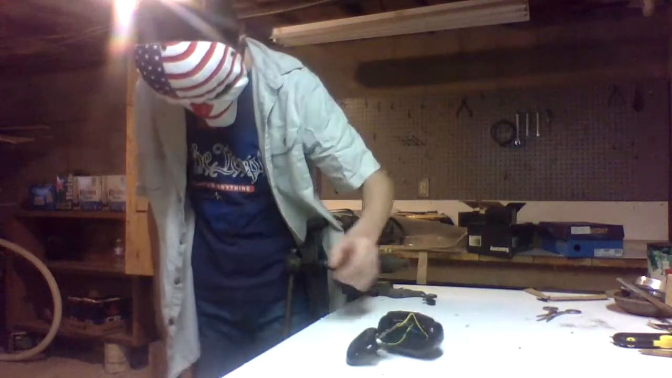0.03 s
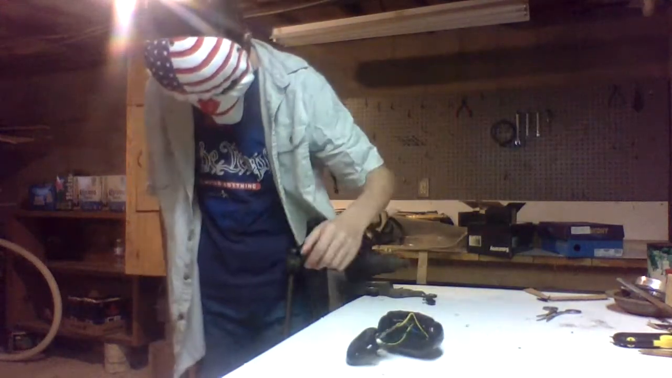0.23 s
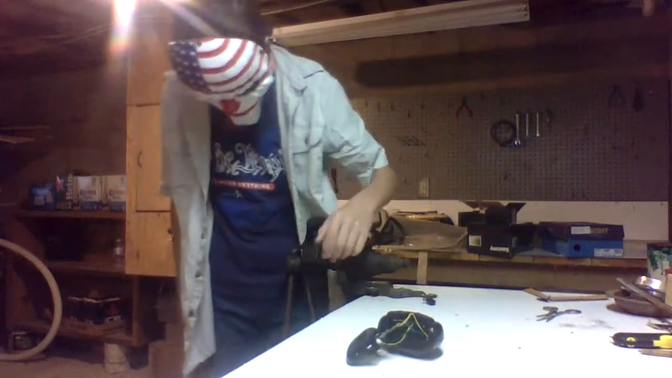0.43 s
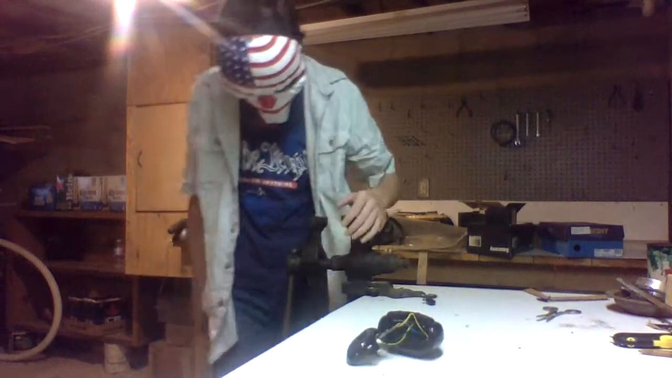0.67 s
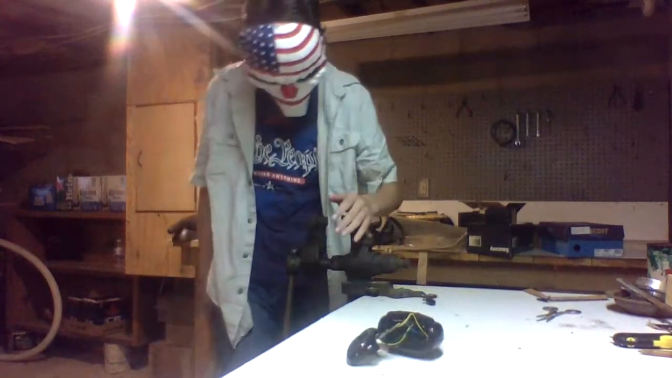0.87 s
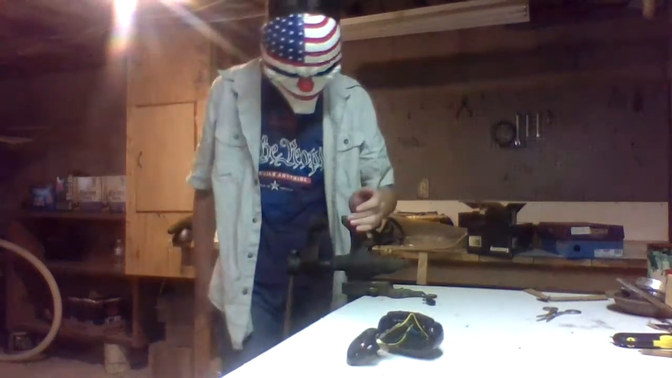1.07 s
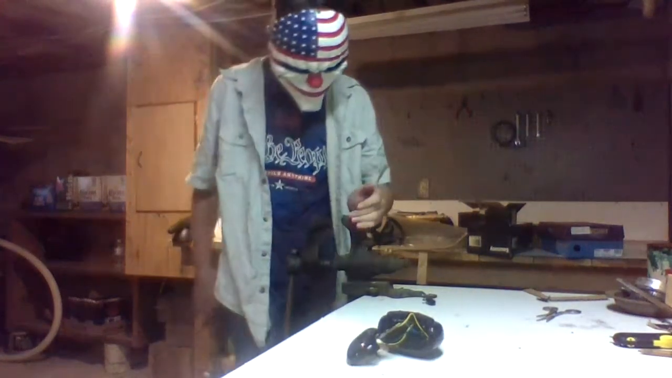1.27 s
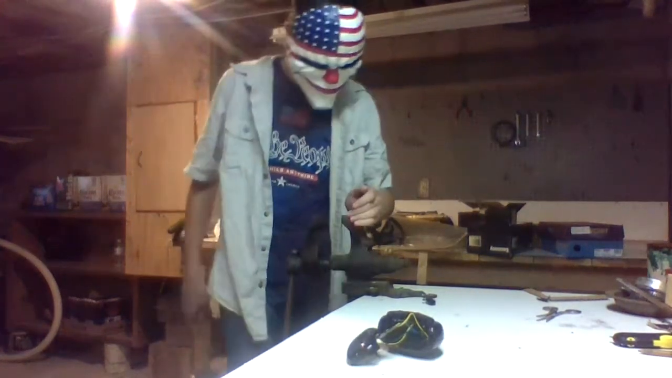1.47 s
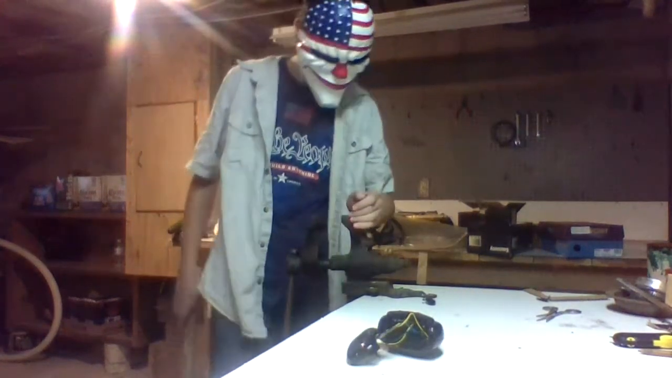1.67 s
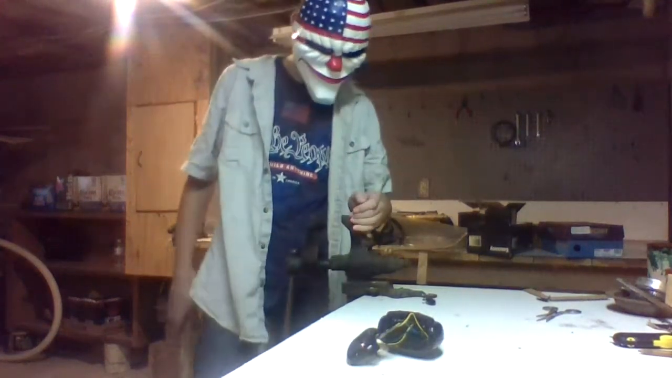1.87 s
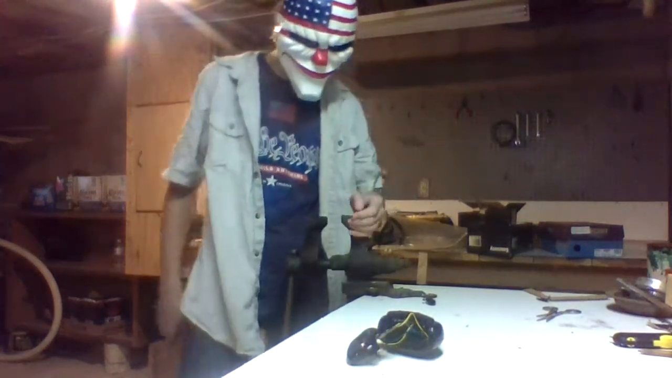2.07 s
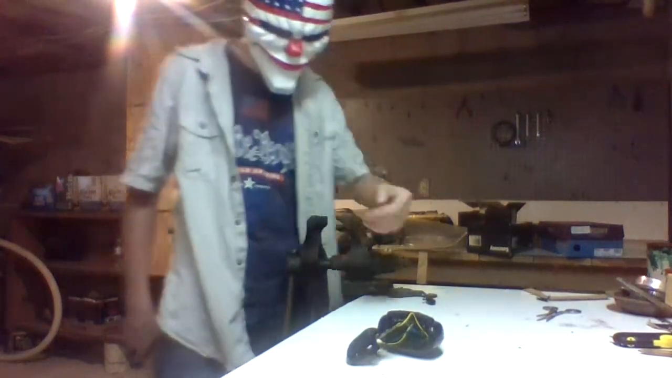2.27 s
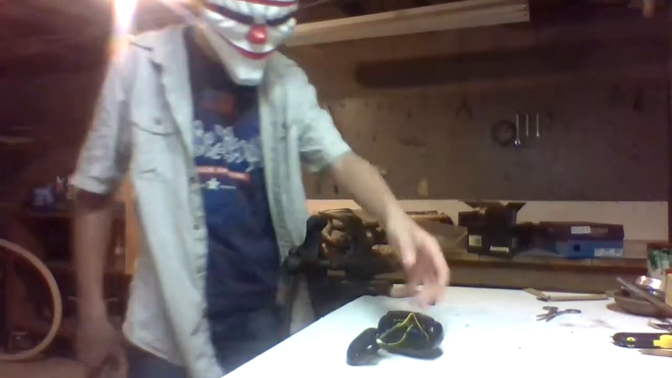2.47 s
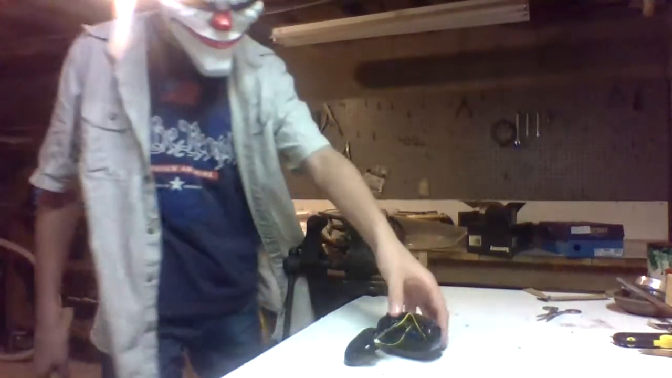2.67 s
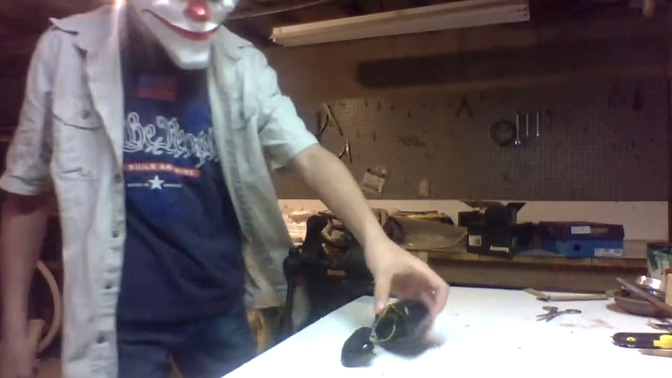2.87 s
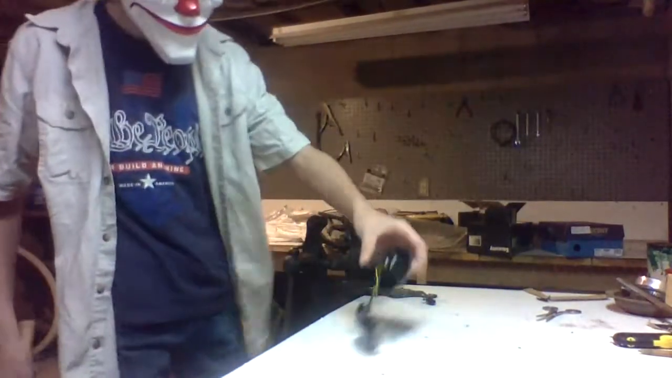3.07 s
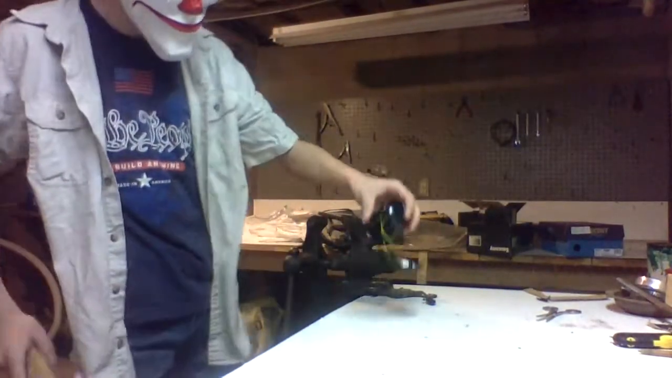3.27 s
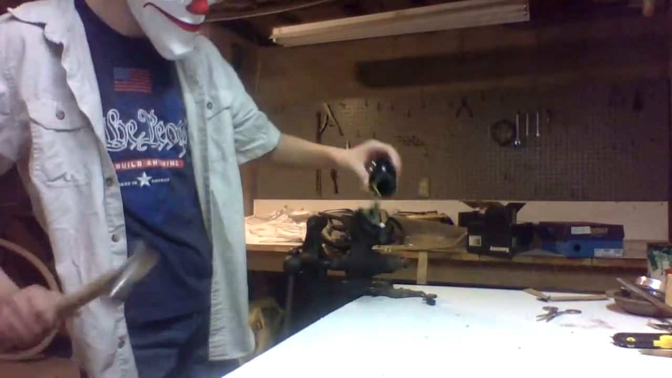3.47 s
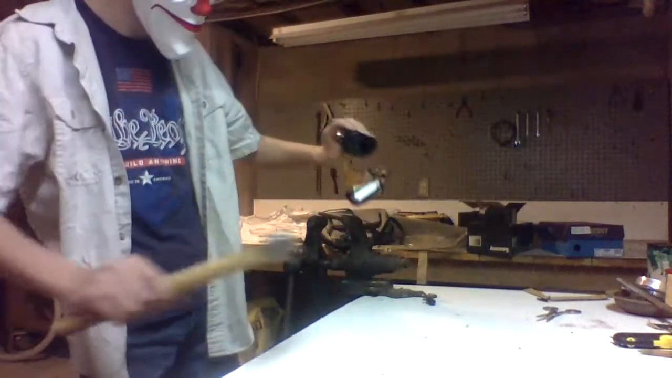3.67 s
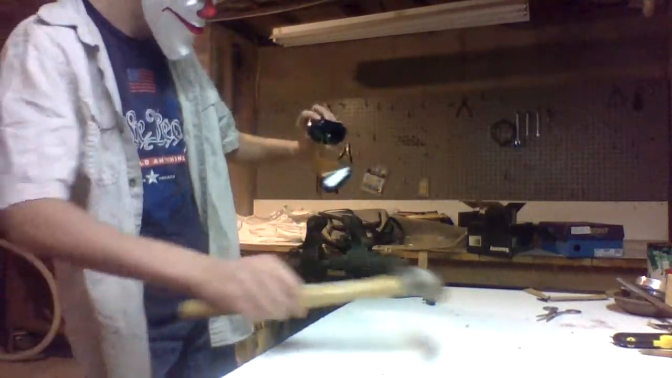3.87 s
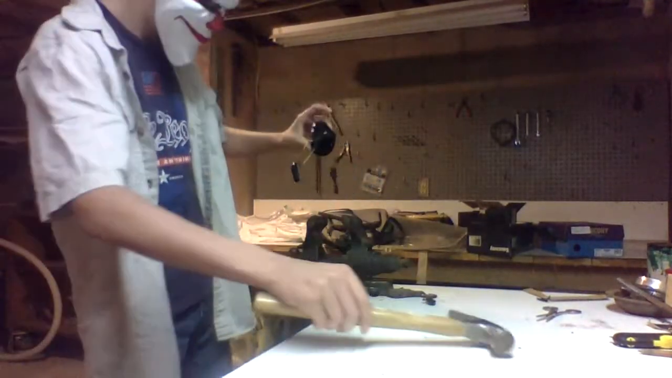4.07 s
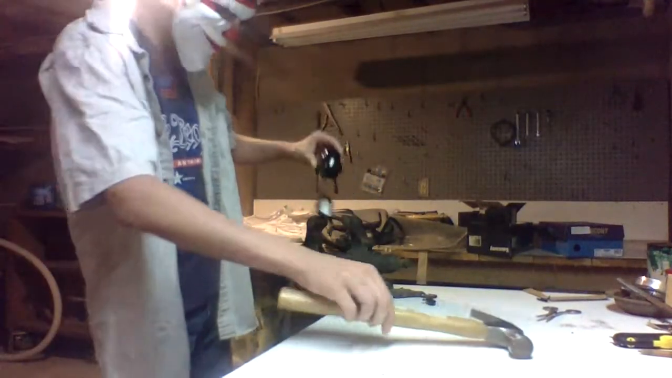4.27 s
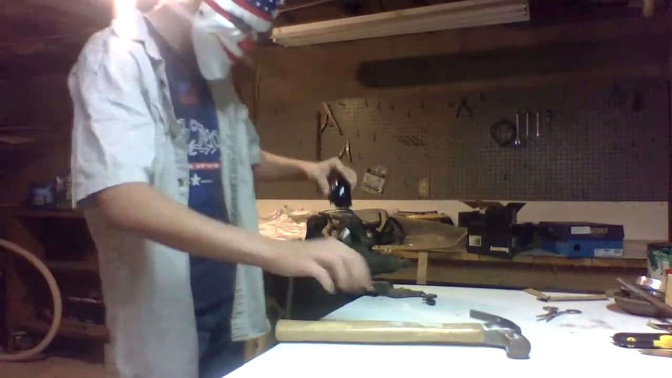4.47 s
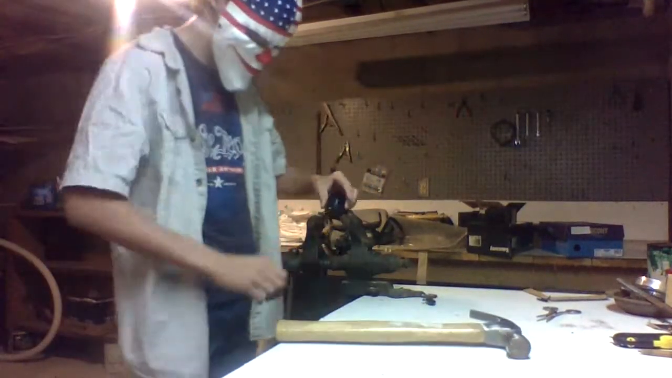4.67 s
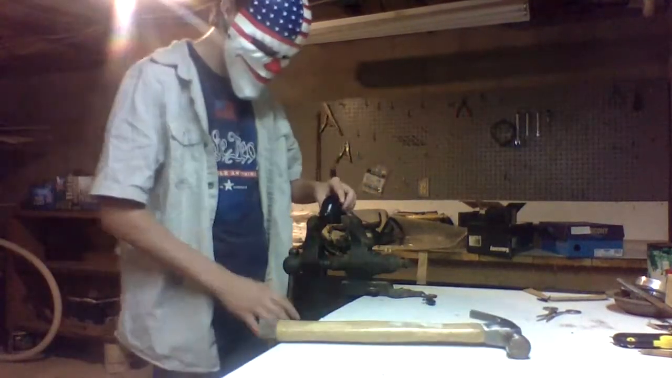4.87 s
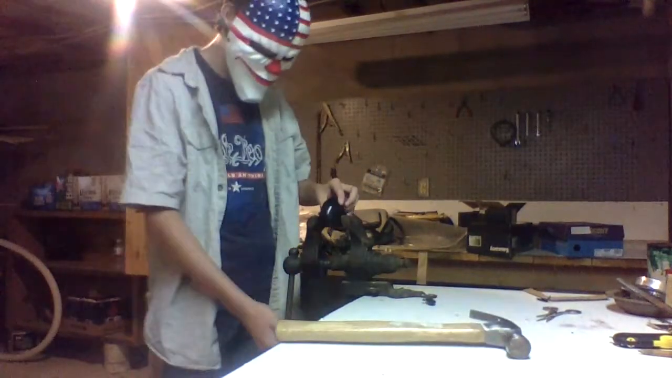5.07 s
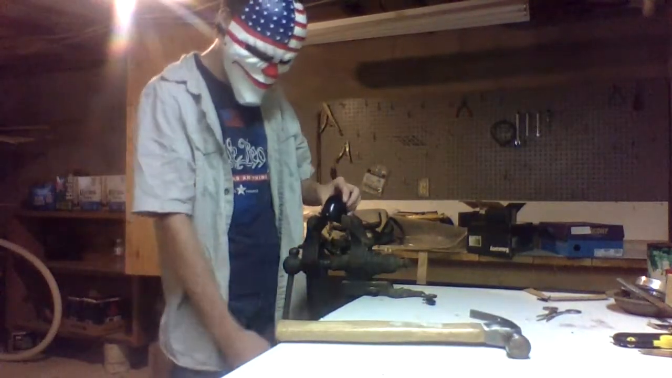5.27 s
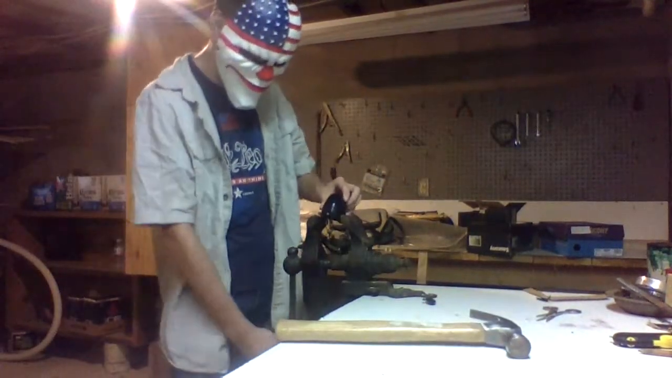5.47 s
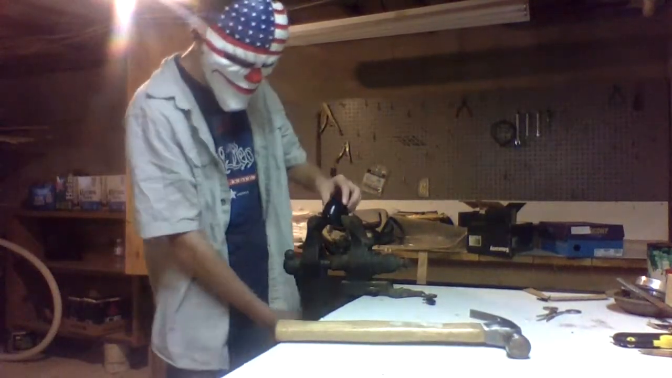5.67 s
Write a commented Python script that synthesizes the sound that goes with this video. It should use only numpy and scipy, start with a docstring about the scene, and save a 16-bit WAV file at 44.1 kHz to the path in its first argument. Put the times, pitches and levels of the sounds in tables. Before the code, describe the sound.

Mono close bench pickup with wavering mains hum, low rumble, faint whine and hiss. First come gritty scraping of plastic shards under a shoe and stick-slip squeaks, then thin scuffs, cloth rustle and hollow knocks of a plastic case. A heavy hammer lands on the bench, bounces and bangs again, overloading the input. Loose plastic parts clack, soft footsteps thump, and the shoe scrapes once more. The room tail is short.

```python
"""A workshop heard in mono at the bench: wavering mains hum, whine, rumble and hiss lie under everything.
A sleeve rustles, then a shoe sweeps plastic shards over gritty floor: grains crackle, stick-slip squeals.
Thin scuffs and knocks of a hollow clock case follow, with loose parts rubbing and clacking as damped modes.
A hammer dropped on the bench, noise bands and modes dying together, drives the input into clipping.
More clacks come after it, then low footfalls and one last short sweep of the shoe."""
import sys
import numpy as np
from scipy import signal
from scipy.fft import rfft, irfft
from scipy.io import wavfile
from scipy.ndimage import uniform_filter1d

SR = 44100
rng = np.random.default_rng(int(sys.argv[2]) if len(sys.argv) > 2 else 0)


def to_wav(sig):
    """Store sig (one row per channel, or 1-D mono) as 16-bit WAV at the path in sys.argv[1].

    Samples outside -1..1 are clipped; the rate is SR.
    """
    pcm = np.clip(np.atleast_2d(sig), -1, 1) * 32767
    pcm = np.round(pcm).astype(np.int16)
    wavfile.write(sys.argv[1], SR, pcm.T)  # frames by channels


N = 252252
TIME = np.arange(N) / SR  # s
FREQ = np.maximum(np.arange(N // 2 + 1) * SR / N, 1)  # Hz


def undb(db):
    """Level law: decibels to amplitude gain."""
    return 10 ** (np.asarray(db) / 20)


def unit(x):
    """Normalisation: scale to rms 1."""
    return x / np.sqrt(np.mean(x ** 2))


def colour(x, points):
    """Spectral shaping by a (Hz, dB) outline that falls 18 dB per octave more beyond its ends."""
    hz, db = np.transpose(points)
    octaves_below = np.maximum(np.log2(hz[0] / FREQ), 0)
    octaves_above = np.maximum(np.log2(FREQ / hz[-1]), 0)
    outline_db = np.interp(np.log(FREQ), np.log(hz), db)
    gain = undb(outline_db - 18 * (octaves_below + octaves_above))
    return unit(irfft(rfft(x) * gain, N))


def resonate(x, modes):
    """Forced resonance: parallel second-order responses, each (Hz, width Hz, dB)."""
    gain = sum(undb(db) / (1 + 1j * hz / width * (FREQ / hz - hz / FREQ)) for hz, width, db in modes)
    return unit(irfft(rfft(x) * gain, N))


def walk(rate):
    """Low-passed chance: random steps at a rate in Hz, smoothed, with a spread near 1."""
    step = max(int(SR / rate), 1)
    held = np.repeat(rng.standard_normal(N // step + 1), step)
    # smoothing lowers the spread; the factor restores it
    return np.sqrt(3 / 2) * uniform_filter1d(held, step)[:N]


def grains(per_s, spread_db):
    """Granular friction: a random train of tiny clicks of unequal size."""
    size = undb(spread_db * np.minimum(rng.exponential(size=N), 5))
    present = rng.random(N) < per_s / SR
    return unit(present * size * rng.standard_normal(N))


def swell(middle_s, half_s):
    """Gaussian envelope: a bell-shaped rise and fall."""
    return np.exp(-.5 * ((TIME - middle_s) / half_s) ** 2)


def gesture(start_s, rise_s, hold_s, release_db_per_s):
    """Envelope of one movement: a linear rise, a hold and an exponential release."""
    age = TIME - start_s
    release_s = np.maximum(age - rise_s - hold_s, 0)
    return np.clip(age / rise_s, 0, 1) * undb(-release_db_per_s * release_s)


def add(out, s, x):
    """Superposition: mix x in at time s."""
    i = int(s * SR)
    out[i:i + len(x)] += x[:N - i]


def strikes(events, body, modes, modes_db, crack_db, crack_s):
    """Impact response: a short crack, a dense ring that dies band by band, and the object's own modes."""
    t = TIME[:SR // 2]
    centres = 44 * 2 ** (np.arange(18) / 2)  # Hz, half an octave apart
    hz, db, t60 = np.transpose(body)
    band_db = np.interp(np.log(centres), np.log(hz), db)
    band_t60 = np.interp(np.log(centres), np.log(hz), t60)
    filters = [signal.butter(2, [f / 2 ** .25, f * 2 ** .25], "band", fs=SR, output="sos") for f in centres]
    out = np.zeros(N)
    for s, level_db, tilt_db, length in events:
        # the point of contact decides how much of each band and mode is woken
        chance_db = rng.standard_normal(len(centres))
        weight = undb(band_db + tilt_db * np.log2(centres / 500) + chance_db)
        # normalise by the noise power the bands pass
        weight = weight / np.sqrt(np.sum(weight ** 2 * centres) / (np.sqrt(2) * SR))
        # a hand or a second contact shortens the ring
        fade = -np.log(1000) * t / max(length, .1)
        decay = np.exp(fade / band_t60[:, None]) + undb(crack_db) * np.exp(-t / crack_s)
        noise = rng.standard_normal(2 * len(t))
        # the first half of the noise lets the filters settle
        bands = np.array([signal.sosfilt(sos, noise)[len(t):] for sos in filters])
        hit = weight @ (bands * decay)
        for f, mode_db, ring_s in modes:
            size = undb(modes_db + mode_db + 2 * rng.standard_normal()) * rng.choice([-1, 1])
            detune = 1 + .025 * rng.standard_normal()
            hit = hit + size * np.sin(2 * np.pi * f * detune * t) * np.exp(fade / ring_s)
        add(out, s, undb(level_db) * hit)
    return out


def damped(hits, ring, halving_db):
    """Contact damping: a part pressed home firmly stops sooner than one that merely taps."""
    typical_db = -18  # a hit at this level has ring length factor ring
    return [(s, db, tilt, ring * .5 ** ((db - typical_db) / halving_db)) for s, db, tilt in hits]


def room(x, wet_db, t60_s):
    """Reverberation: a cluttered shop answers with a short, exponentially decaying diffuse tail."""
    t = TIME[:SR // 2]
    tail = rng.standard_normal(len(t)) * np.exp(-np.log(1000) * t / t60_s)
    tail = tail * (t > .005)  # the first reflections arrive after 5 ms
    return x + undb(wet_db) * signal.fftconvolve(x, tail / np.sqrt(np.sum(tail ** 2)))[:N]


def background():
    """Stationary sources: steady tones with wandering phase and level, and two shaped noises."""
    # Mains hum. Each row: frequency in Hz, rms level in dB before the waver.
    hum_tones = [(59.2, -29.5), (120, -41.5), (180, -59.5)]
    # Faint electronic whine. Each row: frequency in Hz, rms level in dB before the waver.
    whine_tones = [(2896, -64), (8000, -57), (11590, -65), (13103, -60)]
    # Spectrum of the microphone hiss. Each row: frequency in Hz, relative level in dB.
    hiss_outline = [(150, -49), (250, -3.5), (1770, -13.5), (2980, -12), (3480, -13), (6380, -12.5),
                    (7580, -16), (7990, -13), (15700, -8.5)]
    tones = np.zeros(N)
    for hz, db in hum_tones + whine_tones:
        phase = 2 * np.pi * hz * TIME + 0.6 * walk(3.5)
        tones += undb(db) * np.sqrt(2) * np.sin(phase)
    rumble = colour(rng.standard_normal(N), [(22, 10.5), (60, 0.5), (110, -8.5), (250, -15.5)])
    hiss = colour(rng.standard_normal(N), hiss_outline)
    return tones * undb(.5 * walk(4.6)) + undb(-35.5) * rumble + undb(-40) * hiss


def footfalls():
    """Transient low-frequency vibration: each step sets the floor and bench swaying briefly."""
    # Footfalls through the floor. Each row: middle in seconds, half length in seconds,
    # frequency in Hz, peak level in dB.
    steps = [(1.323, 0.013, 62.2, -18), (1.423, 0.0052, 310, -20.5), (2.682, 0.062, 48, -33),
             (5.224, 0.015, 54.46, -19.5), (5.348, 0.023, 51.7, -15), (5.4, 0.017, 93.2, -21),
             (5.564, 0.02, 55, -15)]
    out = np.zeros(N)
    for s, half_s, hz, db in steps:
        out += undb(db) * swell(s, half_s) * np.sin(2 * np.pi * (hz * TIME + rng.random()))
    return out


def handling():
    """Fibre friction: cloth hisses over cloth while loose parts rub along the bench."""
    # Movements of sleeve and trailing parts. Each row: start in seconds, rise in seconds,
    # hold in seconds, relative level in dB, low rub relative to that level in dB.
    movements = [(0.144, 0.081, 0.29, -37.5, -3.5), (1.766, 0.04, 0.44, -44, 0.5),
                 (2.342, 0.089, 0.17, -28, -13.5), (2.576, 0.004, 0.15, -32.5, 1),
                 (2.822, 0.016, 0.013, -43, 11.5), (2.883, 0.018, 0.091, -57, 21),
                 (2.985, 0.02, 0.28, -31, 2.5), (3.175, 0.036, 0.19, -26.5, -3.5),
                 (3.854, 0.0051, 0.073, -36.5, -23), (5.026, 0.07, 0.026, -29.5, -5),
                 (5.31, 0.093, 0.007, -30, -2)]
    # Spectrum of the cloth. Each row: frequency in Hz, relative level in dB.
    cloth_outline = [(710, -4.5), (1200, 0), (2080, 4), (2750, 0.5), (6090, 0.5), (7240, -4.5),
                     (9780, -2.5), (15700, -1.5)]
    cloth = colour(rng.standard_normal(N), cloth_outline) * undb(2.3 * walk(90))
    rub = colour(grains(per_s=3100, spread_db=0.5),
                 [(250, 1.5), (320, -2.5), (450, 1.5), (700, 2.5), (1500, -7.5)])
    speed, press = np.zeros(N), np.zeros(N)
    for s, rise_s, hold_s, db, rub_db in movements:
        move = undb(db) * gesture(s, rise_s, hold_s, release_db_per_s=206)
        speed = np.maximum(speed, move)
        press = np.maximum(press, undb(rub_db) * move)
    return undb(-0.5) * speed * cloth + undb(-4.5) * press * rub


def scuffs():
    """Granular friction: plastic brushes past in brief, bright bursts of grains."""
    # Thin, high scuffs of plastic. Each row: middle in seconds, level in dB.
    brushes = [(2.051, -32), (2.132, -34), (2.255, -28.5)]
    # Spectrum of a scuff. Each row: frequency in Hz, relative level in dB.
    scuff_outline = [(2500, -6.5), (6000, -4), (11000, 2.5), (15700, -1)]
    envelope = sum(undb(db) * swell(s, half_s=0.011) for s, db in brushes)
    return colour(grains(per_s=3300, spread_db=0), scuff_outline) * envelope


def knocks():
    """Cavity resonance: light knocks on wood wake the damped modes of the hollow clock case."""
    # Knocks of the case. Each row: time in seconds, level in dB, treble tilt in dB per octave.
    hits = [(1.004, -21, -0.5), (2.146, -26, -16.5), (2.582, -16.5, 2.5), (2.604, -20, 0.5),
            (2.641, -20, -15), (2.667, -20, -4), (2.686, -8, -4.5), (2.742, -20, -17), (2.76, -27, -8),
            (2.846, -26, -3), (2.9949, -9, -3), (3.0028, -13.5, -12), (4.588, -22, -5), (4.653, -22, 5),
            (4.772, -25.5, -9), (5.405, -19, 5)]
    # Dense ring of the case. Each row: frequency in Hz, relative level in dB,
    # 60 dB decay time in seconds at ring length factor 1.
    case_ring = [(119, -16, 0.026), (322, 10, 0.25), (705, 23.5, 0.082), (1090, 21.5, 0.028),
                 (2320, 7, 0.24), (5830, 3.5, 0.021), (14800, -53, 0.026)]
    # Single modes of the case, with the same columns: Hz, relative dB, decay seconds.
    case_modes = [(307, -2, 0.14), (409, -8, 0.11)]
    return strikes(damped(hits, ring=0.65, halving_db=8), case_ring, case_modes,
                   modes_db=-6.5, crack_db=0.5, crack_s=0.0021)


def clacks():
    """Free vibration of small bodies: loose plastic parts of the clock clack with short, bright modes."""
    # Clacks of the parts. Each row: time in seconds, level in dB, treble tilt in dB per octave.
    hits = [(3.036, -23, 8), (3.2584, -19.5, 12), (3.277, -20, 10), (3.287, -23.5, 4), (3.8481, -35, 1),
            (4.5177, -5.5, 5.5), (4.533, -16.5, -2.5), (4.544, -13.5, -4.5), (4.580, -17.5, -1.5),
            (4.668, -19.5, -5), (4.6735, -9.5, 10), (4.7342, -15, 4.5), (4.8225, -23, -4),
            (4.837, -20, -1.5), (4.9728, -27.5, -3)]
    # Dense ring of a plastic part. Each row: frequency in Hz, relative level in dB,
    # 60 dB decay time in seconds at ring length factor 1.
    plastic_ring = [(60, -34, 0.1), (203, -0.5, 0.45), (700, -0.5, 0.3), (2000, 4.5, 0.15), (4240, 4, 0.09),
                    (6100, 5, 0.016), (9200, 2, 0.013), (16700, -9, 0.3)]
    # Single modes of a plastic part, with the same columns: Hz, relative dB, decay seconds.
    plastic_modes = [(2270, 1, 0.089), (3350, 15, 0.071), (3950, 10.5, 0.07), (5760, -4, 0.05),
                     (6370, 11, 0.032), (6200, 17.5, 0.075)]
    return strikes(damped(hits, ring=0.69, halving_db=25), plastic_ring, plastic_modes,
                   modes_db=-23, crack_db=12.0, crack_s=0.0022)


def slide():
    """Kinetic friction: the shoe's speed as a gain, a light touch, then a push that loses pace and lifts."""
    # Sweeps of the shoe. Each row: start in seconds, length of the light touch before it in seconds,
    # slide in seconds, level at the start in dB.
    sweeps = [(0.672, 0.082, 0.225, -13), (1.253, 0.048, 0.495, -11.5), (1.82, 0.02, 0.039, -21.5),
              (5.573, 0.018, 0.013, -10)]
    attack_s, sag_db_per_s, release_db_per_s = 0.0075, 18, 263
    speed = np.zeros(N)
    for s, touch_s, slide_s, db in sweeps:
        # the touch is 9.5 dB below the push
        touch = undb(-9.5) * gesture(s - touch_s, touch_s + attack_s, 0, release_db_per_s)
        push = gesture(s, attack_s, slide_s, release_db_per_s)
        sagging = undb(db - sag_db_per_s * np.maximum(TIME - s, 0))
        speed += sagging * np.maximum(touch, push)
    return speed


def shoe():
    """Friction-driven resonance: grit crackles under ringing shards; the sole rumbles as it bears down."""
    # Spectrum of the grit. Each row: frequency in Hz, relative level in dB.
    grit_outline = [(530, -80), (900, -20.5), (1140, -16.5), (2100, 0), (2520, -5.5), (3050, -0.5),
                    (3320, -4), (5750, -3.5), (7660, -6.5), (11100, -5.5), (13800, -10.5), (15700, -18.5)]
    # Thin rings of the sliding shards. Each row: frequency in Hz, width in Hz, relative level in dB.
    shard_modes = [(1742, 94, 0), (2700, 180, 4), (3630, 150, 4), (5940, 200, -0.5), (9440, 39, 8.5),
                   (10730, 180, 6), (13500, 60, -5), (13300, 200, 6)]
    # Weight comes onto the sole. Each row: start in seconds, rise in seconds, hold in seconds,
    # relative level in dB.
    presses = [(0.594, 0.076, 0.081, -28.5), (1.173, 0.03, 0.05, -34.5), (1.247, 0.015, 0.052, -25.5),
               (1.388, 0.0074, 0.01, -25), (5.541, 0.0072, 0.028, -21)]
    # The shards catch and break free. Each row: time in seconds, level in dB, fade constant in seconds.
    catches = [(0.321, -14, 0.016), (0.615, -25, 0.033), (0.681, -7.5, 0.027), (0.738, -11, 0.0076),
               (0.83, -4.5, 0.0069), (0.856, -19, 0.017), (1.263, 5.5, 0.017), (1.423, -8, 0.0078),
               (1.484, -7, 0.012), (5.549, -15.5, 0.025), (5.604, -10, 0.015)]
    friction = grains(per_s=9000, spread_db=-1.5) * undb(2.8 * walk(130))
    shards = resonate(grains(per_s=6300, spread_db=2), shard_modes)
    grit = unit(colour(friction, grit_outline) + undb(-8.0) * shards)
    sole = colour(grains(per_s=2500, spread_db=3.5),
                  [(170, -3), (300, 0.5), (500, -0.5), (800, 3), (1300, 3.5)])
    weight = np.zeros(N)
    for s, rise_s, hold_s, db in presses:
        weight += undb(db) * gesture(s, rise_s, hold_s, release_db_per_s=247)
    out = slide() * grit + undb(-0.5) * weight * sole
    for s, db, fade_s in catches:
        age = np.maximum(TIME - s, 0)
        out += undb(db) * (1 - np.exp(-age / 0.0039)) * np.exp(-age / fade_s) * grit
    return out


def squeals():
    """Stick-slip drives resonances of the plastic, unevenly in both rate and strength."""
    # Loudest squeals of sliding plastic. Each row: middle in seconds, mean frequency in Hz,
    # relative level in dB.
    loud_squeals = [(0.712, 1749, -11), (0.738, 2093, -7), (0.745, 2970, -9), (1.27, 1823, -11.5),
                    (1.28, 2940, -11), (1.4, 1895, -10.5), (1.423, 2155, -8.5), (1.459, 2053, -9.5),
                    (1.505, 3650, -13), (1.642, 2800, -16.5), (1.694, 1800, -13.5), (1.743, 2110, -15.5),
                    (2.606, 2205, -21.5), (2.848, 2240, -32.5), (4.827, 2115, -24.5), (5.588, 2480, -7.5),
                    (5.61, 790, -17), (5.625, 2550, -25)]
    # Fainter squeals, coming and going by chance all through a slide.
    # Each row: mean frequency in Hz, level relative to the slide in dB.
    judder = [(1990, -11), (2850, -21)]
    unsteady = walk(500)
    grip = unit(undb(3.7 * walk(350)))
    # the integral of relative pitch: times Hz, it gives turns of phase
    turns = np.cumsum(1 + .06 * unsteady) / SR
    loud = np.zeros(N)
    for s, hz, db in loud_squeals:
        loud += undb(db) * swell(s, half_s=0.01) * np.sin(2 * np.pi * hz * turns)
    drifting = turns + np.cumsum(0.04 * walk(25)) / SR  # a slower drift, as a share of the pitch
    faint = np.zeros(N)
    for hz, db in judder:
        strength = unit(undb(6.5 * walk(30)))
        faint += undb(db) * strength * np.sin(2 * np.pi * hz * drifting)
    return grip * (loud + slide() * faint)


def hammer():
    """Impact excitation: a dropped hammer bounces, waking the bench modes and a ring of wood and steel."""
    # Blows on the bench. Each row: time in seconds, level in dB, treble tilt in dB per octave,
    # ring length factor.
    blows = [(4.0142, 8, 0.5, 0.74), (4.034, -6, -3, 0.58), (4.051, -2, -0.5, 1.04), (4.119, 4.5, -1, 0.95),
             (4.161, -7, -4.5, 0.76), (4.3205, -22, -3.5, 0.83), (4.3759, 13, -0.5, 0.5),
             (4.394, 6, 0.5, 0.67), (4.4472, 3, 0, 0.32), (4.462, -6, -5.5, 0.58)]
    # Dense ring of wood and steel. Each row: frequency in Hz, relative level in dB,
    # 60 dB decay time in seconds at ring length factor 1.
    thud = [(50, 3, 0.56), (155, 1.5, 0.31), (490, -5.5, 0.19), (1140, -1, 0.13), (2750, -15, 0.24),
            (7500, -13, 0.018), (10500, -18.5, 0.21), (15500, -26, 0.22)]
    # Single modes of the bench top, with the same columns: Hz, relative dB, decay seconds.
    bench_modes = [(42.1, -4, 0.38), (61.5, -6, 0.29), (100.7, -1.5, 0.13), (163.6, 2.5, 0.1),
                   (197.4, -7, 0.36), (302.4, -3, 0.093), (358, -1, 0.15), (422, 1.5, 0.079),
                   (734, -7, 0.13), (1087, -14.5, 0.11)]
    return strikes(blows, thud, bench_modes, modes_db=-4.0, crack_db=6.5, crack_s=0.0045)


def scene():
    """Superposition: all sources add at one microphone, the struck and sliding ones with a room tail."""
    bench = room(hammer(), wet_db=-16.5, t60_s=0.39)
    bench += room(knocks(), wet_db=-7.5, t60_s=0.066)
    bench += room(clacks(), wet_db=-4.0, t60_s=0.16)
    floor = room(shoe() + squeals(), wet_db=-6.5, t60_s=0.23)
    mono = bench + floor + footfalls() + handling() + scuffs() + background()
    return np.array([mono, mono])


def record(dry):
    """Amplitude limiting: the input clips flat near full scale, then a low-pass cuts the top."""
    top_hz = 15800
    clipped = np.clip(dry, -.97, .97)
    return signal.sosfiltfilt(signal.ellip(10, .1, 50, top_hz, fs=SR, output="sos"), clipped)


dry = scene()
out = record(dry)
to_wav(out)
```